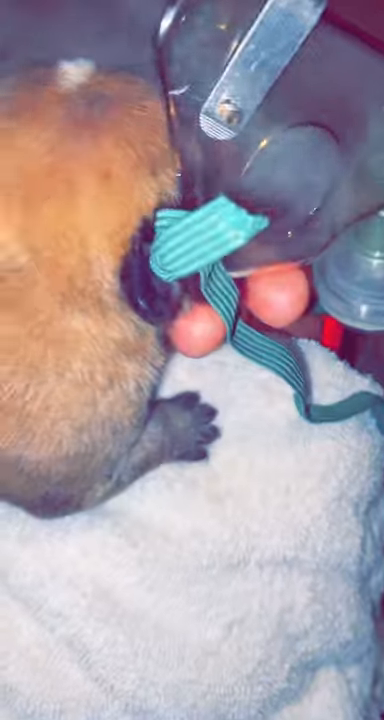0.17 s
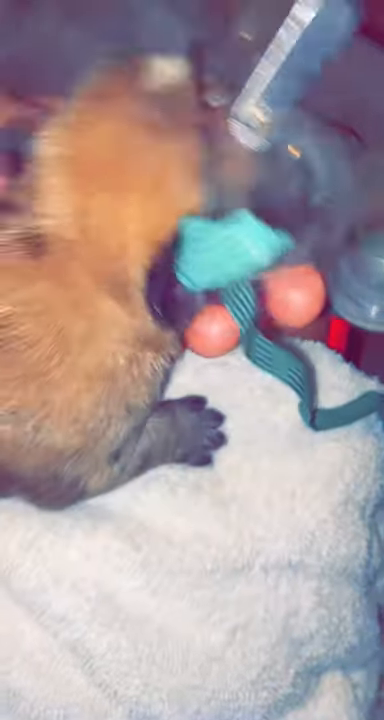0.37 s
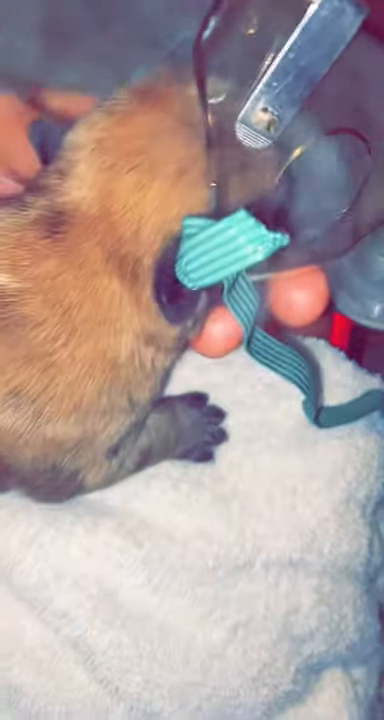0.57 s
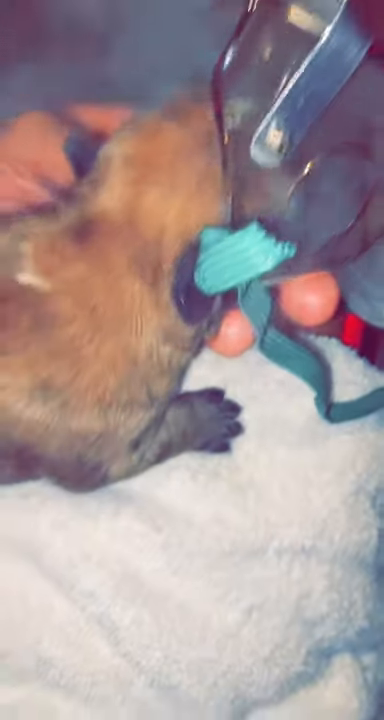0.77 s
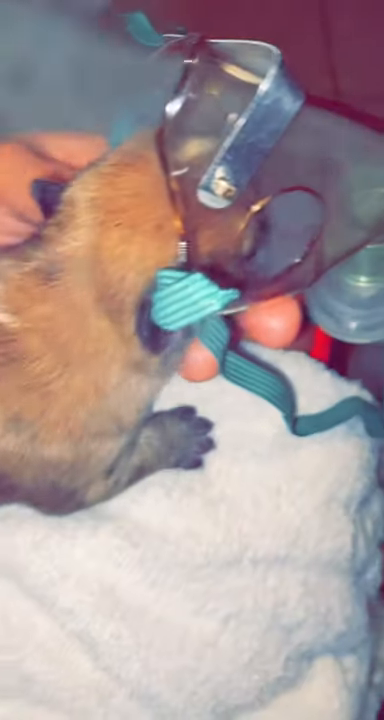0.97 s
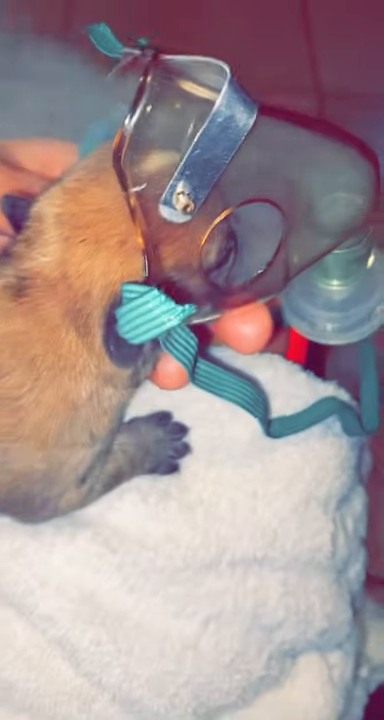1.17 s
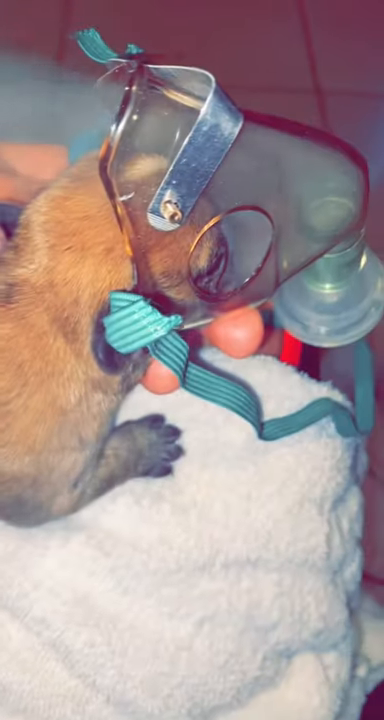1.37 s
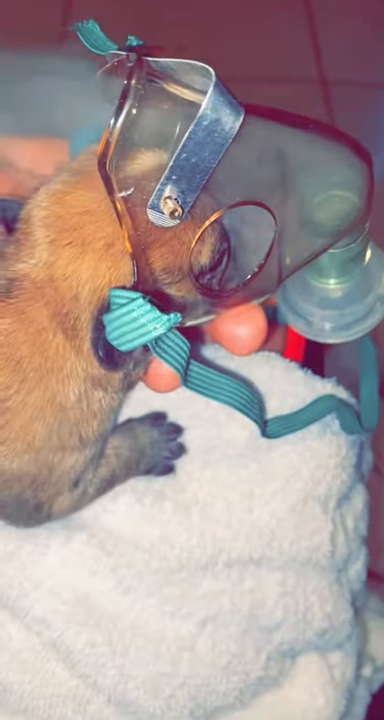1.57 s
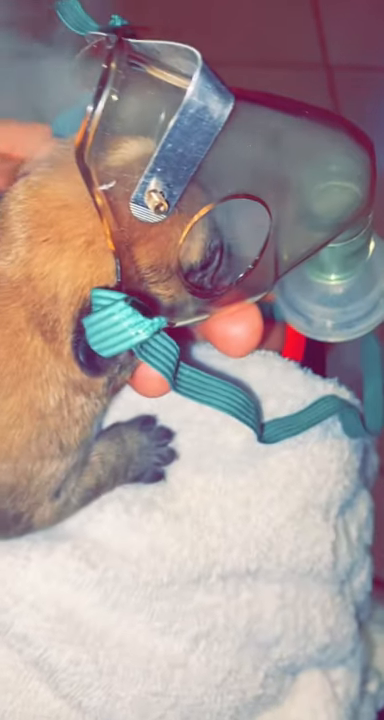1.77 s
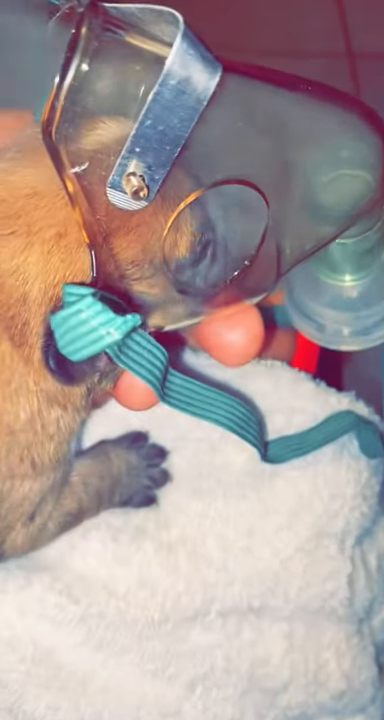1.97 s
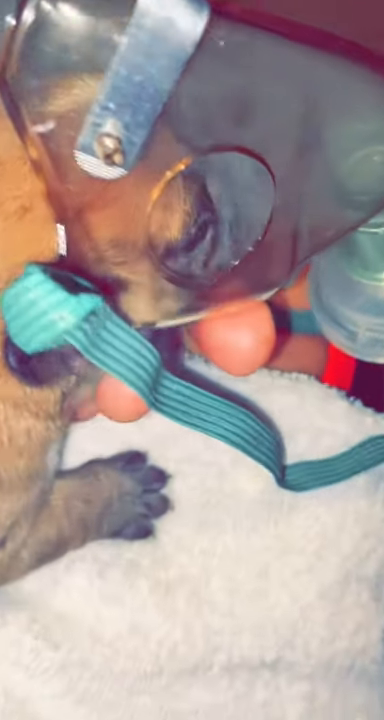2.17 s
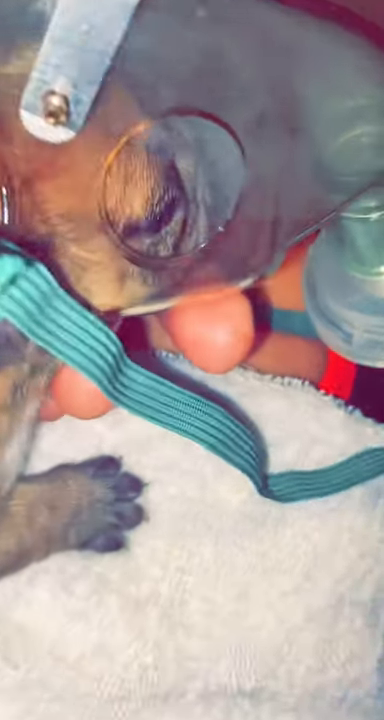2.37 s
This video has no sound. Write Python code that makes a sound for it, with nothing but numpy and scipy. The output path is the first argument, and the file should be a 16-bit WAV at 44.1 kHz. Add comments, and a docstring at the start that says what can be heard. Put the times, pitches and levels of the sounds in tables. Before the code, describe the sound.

Nebulizer running close by indoors: a rapid droning motor buzz under a breathy, spitting spray hiss

```python
"""Indoors, a nebulizer runs, heard in mono from beside its mask, after a moment of silence.
The piston compressor throbs once a turn: tones at multiples of the shaft rate line up at each stroke.
Noise that surges with the strokes, steady-pitched hum and a repeating valve rattle fill in the pump.
The jet is shaped noise that hisses, whistles and spits; its colour shifts as the mask is moved.
Droplets tick in the cup as short fading tones."""
import sys
import numpy as np
from scipy.fft import rfft, irfft, next_fast_len
from scipy.io import wavfile
from scipy.ndimage import map_coordinates

SR = 44100
rng = np.random.default_rng(int(sys.argv[2]) if len(sys.argv) > 2 else 0)


def dump_mix(stems):
    """Bounce the given channels to the path in sys.argv[1] as a 16-bit WAV at rate SR."""
    frames = np.atleast_2d(stems).T  # one column per channel
    limited = np.clip(frames, -1, 1)  # hard clip at full scale
    pcm = np.round(limited * 32767).astype(np.int16)
    wavfile.write(sys.argv[1], SR, pcm)


N = 111573  # length in samples

# Tones in each pump stroke: shaft_multiple, relative_level_db
THROB_TONES = [(10, -46), (11, -29.5), (12, -27), (13, -25), (14, -35), (15, -42.5)]
# Rise and fall of the throb, used around its own average: time_s, relative_level_db
THROB_SWELL_CURVE = [(.14, -25), (.23, -19.5), (.38, -24.5), (.49, -19), (.59, -23.5), (.87, -19.5),
                     (.98, -22), (1.1, -20), (1.3, -19.5), (1.36, -23), (1.44, -19.5), (1.52, -24),
                     (1.75, -19.5), (1.97, -25.5), (2.06, -23), (2.17, -25.5), (2.35, -21), (2.52, -22.5)]
# Hum and whine of the housing: shaft_multiple, level_db (before a slight waver)
HOUSING_HUM = [(1, -44), (2, -39.5), (3, -48.5), (4, -39), (5, -47.5), (6, -45.5), (7, -47), (8, -47),
               (16, -44.5), (17, -48.5), (20, -49.5), (22, -51.5), (23, -49), (25, -48.5), (28, -51),
               (29, -53), (30, -56), (31, -54), (32, -55), (54, -44.5), (61, -46.5), (73, -47.5), (76, -58),
               (78, -45), (83, -45.5)]
# Motor buzz at fixed pitches: pitch_hz, level_db (before a slight waver)
MOTOR_BUZZ = [(120, -43.5), (128, -46.5), (240, -45.5)]
# Tone colour of the valve rattle: frequency_hz, relative_level_db
RATTLE_COLOUR = [(900, -50), (1050, 2), (1700, -9), (2000, -24), (3000, -13), (3500, -21), (4200, -8),
                 (5000, -18), (6500, -9), (9000, -24)]
# Tone colour of air churning in the pump: frequency_hz, relative_level_db
CHURN_COLOUR = [(25, -70), (45, -45), (70, -13), (100, -12.5), (190, -16.5), (290, -7), (420, -9),
                (520, -2), (600, 0.5), (720, -2.5), (810, -9), (960, -6), (1200, -17), (1700, -24.5),
                (3000, -45)]
# Hiss through the mask before it is moved: frequency_hz, relative_level_db
HISS_COLOUR_BEFORE = [(600, -17), (1800, -13), (2300, -2.5), (2600, -8.5), (2950, -7), (3500, -2.5),
                      (4500, -5), (5250, 2.5), (6000, -8), (6600, -5.5), (7000, -7.5), (7600, -5),
                      (8300, -7), (9200, -17.5), (11200, -26), (13000, -40)]
# Hiss through the mask after it is moved: frequency_hz, relative_level_db
HISS_COLOUR_AFTER = [(600, -7), (1800, -9.5), (2300, 1), (2600, -4), (3000, -1), (3600, -4.5), (4400, -2.5),
                     (5300, -3.5), (6100, -7.5), (6750, 1.5), (7250, -7.5), (7650, -1), (8300, -8.5),
                     (9200, -18.5), (11200, -30.5), (13000, -40)]
# Loudness of the hiss over time: time_s, relative_level_db
HISS_LOUDNESS = [(0.1, -24.5), (0.23, -26.5), (0.38, -23.5), (0.6, -26), (0.8, -27.5), (1.0, -28),
                 (1.3, -29), (1.55, -28.5), (1.8, -29.5), (2.0, -29), (2.3, -29), (2.5, -27.5)]
# Tone colour of the fine spray: frequency_hz, relative_level_db
FIZZ_COLOUR = [(9000, -39), (10800, -9), (11400, -13.5), (12100, 4), (12700, -13), (13150, -2),
               (13650, -30), (14400, -13), (15000, -4), (15450, 1), (15900, -6.5)]
# Loudness of the fizz over time: time_s, relative_level_db
FIZZ_LOUDNESS = [(0.1, -40.8), (0.25, -42), (0.42, -36.5), (0.6, -42), (0.9, -45), (1.1, -40.0),
                 (1.35, -37.5), (1.6, -40), (1.9, -37.5), (2.1, -38.1), (2.33, -38.5), (2.5, -43.5)]
# Hollow note of the mask, drifting in pitch: time_s, centre_hz, level_db
HOLLOW_NOTE = [(.1, 2958, -36.5), (0.351, 3020, -33), (0.799, 3098, -34.5), (1.048, 2950, -34),
               (1.28, 3140, -39), (1.449, 2936, -41), (1.77, 3016, -32.5), (1.95, 2920, -41),
               (2.2, 3123, -35.5), (2.349, 3000, -39), (2.5, 2580, -38)]
# Breathy whistle of the jet: time_s, level_db
WHISTLE_LOUDNESS = [(.1, -41), (.42, -35.5), (.58, -43), (.77, -31.5), (.92, -48), (1.3, -41), (1.6, -37),
                    (2.1, -40.5), (2.4, -34)]
# Louder drops in the cup: start_s, pitch_hz, level_db
LOUD_DROPS = [(1.2805, 3100, -17), (1.2958, 3600, -14)]

START_S, TOP_HZ = .079, 15800  # when the sound switches in; highest pitch kept
SHAFT_HZ, STROKE_S = 53.865, .4792  # turns per second; time of one stroke, before jitter
JITTER_S, STROKE_SCATTER_DB = .00002, .6  # sizes of the random unevenness in time and level
THROB_DB, DRONE_ORDER, DRONE_DB = -2.5, 12, -24.5  # the drone is also shifted by THROB_DB
CHURN_DB, CHURN_PULSE = -28.5, .15
RATTLE_DB, RATTLE_LOOSE = -42, .39  # level; share of random unevenness
MOVE_FROM_S, MOVE_TO_S = .724, .96  # the mask moves between these times
HISS_DB, FIZZ_DB = -1.93, 3  # added to the loudness curves
HISS_PULSE, SPIT_DB, SPIT_HZ = .099, 1.45, 405.3  # pump pulse; size and rate of the spitting
HOLLOW_WIDTH_HZ, WHISTLE_HZ, WHISTLE_WIDTH_HZ = 200, 7920, 105  # widths reach out to each side
DROPS_PER_S, DROP_HZ, DROP_SPREAD = 170, 2990, .23  # spread is in natural-log pitch, up or down
DROP_DB, DROP_SCATTER_DB, DROP_RANGE_DB = -31, 3, 9  # smallest drop, typical extra, most extra
DROP_CYCLES, DROP_RISE_S = 5.5, .0002  # fade length in cycles; onset time


def amp(db):
    """Turn decibels into a multiplier."""
    return 10 ** (np.asarray(db) / 20)


def unit(x):
    """Scale a sound to an average strength (rms) of 1."""
    return x / np.sqrt(np.mean(x ** 2) + 1e-20)


def along(points, hz):
    """Read a table of frequencies and values, with frequency on a log axis."""
    f, v = np.transpose(points)
    return np.interp(np.log(hz + 1), np.log(f + 1), v)


def curve(rows):
    """Join time and value rows with straight lines, one value per sample."""
    return np.interp(np.arange(N) / SR, *np.transpose(rows))


def wobble(rate):
    """Make a smooth random curve through rate random points a second."""
    points = rng.standard_normal(N // 8)
    return map_coordinates(points, [np.arange(N) * rate / SR], mode="wrap")


def filtered(x, response):
    """Scale each frequency in a sound by the given response."""
    m = next_fast_len(N + 8192)  # spare room keeps the end from wrapping onto the start
    return irfft(rfft(x, m) * response(np.fft.rfftfreq(m, 1 / SR)), m)[:N]


def noise(colour):
    """Shape random noise to a tone colour, with rms 1."""
    return unit(filtered(rng.standard_normal(N), lambda hz: amp(along(colour, hz))))


def narrow(centre_hz, width_hz):
    """Make noise ringing around one pitch, which may glide, with rms 1."""
    def slow_noise():
        """Keep only the slow part of random noise; its width sets the ringing's width."""
        return filtered(rng.standard_normal(N), lambda hz: 1 / (1 + (hz / width_hz) ** 2))

    phase = 2 * np.pi * np.cumsum(centre_hz * np.ones(N)) / SR
    return unit(slow_noise() * np.cos(phase) + slow_noise() * np.sin(phase))


def shaft():
    """Count turns of the slightly unsteady shaft; strokes fall on whole numbers."""
    jitter = JITTER_S * (wobble(7.2) + .3 * wobble(50))
    return SHAFT_HZ * (np.arange(N) / SR - STROKE_S + jitter)


def throb(turns):
    """Tones peaking together make a short hollow burst each stroke, over a drone of the housing."""
    burst = sum(amp(db) * np.cos(2 * np.pi * k * turns) for k, db in THROB_TONES)
    uneven = amp(STROKE_SCATTER_DB * wobble(SHAFT_HZ))
    # Sine rather than cosine: the drone runs a quarter cycle behind
    drone = amp(DRONE_DB) * np.sin(2 * np.pi * DRONE_ORDER * turns)
    swell_db = curve(THROB_SWELL_CURVE)
    level = amp(THROB_DB + swell_db - swell_db.mean())
    return np.sqrt(2) * (burst * uneven + drone) * level


def churn(turns):
    """Low air noise surges with each stroke of the pump."""
    surge = 1 + CHURN_PULSE * np.cos(2 * np.pi * turns)
    return amp(CHURN_DB) * unit(noise(CHURN_COLOUR) * surge)


def jet(turns):
    """Hiss, mask note, whistle and fizz share the pump's pulse and the uneven spitting of the liquid."""
    moved = curve([(MOVE_FROM_S, 0), (MOVE_TO_S, 1)])
    before = np.sqrt(1 - moved) * noise(HISS_COLOUR_BEFORE)
    after = np.sqrt(moved) * noise(HISS_COLOUR_AFTER)
    hiss = (before + after) * amp(HISS_DB + curve(HISS_LOUDNESS))
    hollow_hz = curve([(s, hz) for s, hz, db in HOLLOW_NOTE])
    hollow_db = curve([(s, db) for s, hz, db in HOLLOW_NOTE])
    hollow = narrow(hollow_hz, HOLLOW_WIDTH_HZ) * amp(hollow_db)
    whistle = narrow(WHISTLE_HZ, WHISTLE_WIDTH_HZ) * amp(curve(WHISTLE_LOUDNESS))
    fizz = noise(FIZZ_COLOUR) * amp(FIZZ_DB + curve(FIZZ_LOUDNESS))
    pulse = 1 + HISS_PULSE * np.cos(2 * np.pi * turns)
    spitting = amp(SPIT_DB * wobble(SPIT_HZ))
    return unit(pulse * spitting) * (hiss + hollow + whistle + fizz)


def droplets():
    """Droplets tick in the cup as short ringing tones; higher ones fade faster, and a few are louder."""
    when, pitch, size = rng.random((int(DROPS_PER_S * N / SR), 3)).T
    # Small drops are common, big ones rare
    size_db = np.minimum(-DROP_SCATTER_DB * np.log(1 - size), DROP_RANGE_DB)
    pitch_hz = DROP_HZ * np.exp(DROP_SPREAD * (2 * pitch - 1))
    faint = np.transpose([when * N / SR, pitch_hz, DROP_DB + size_db])
    s, hz, db = np.vstack([faint, LOUD_DROPS]).T[:, :, None]
    t = np.arange(SR // 80) / SR
    fade = np.exp(-hz * t / DROP_CYCLES)
    onset = 1 - np.exp(-t / DROP_RISE_S)
    ticks = amp(db) * np.sin(2 * np.pi * hz * t) * fade * onset
    at = (s * SR).astype(int) + np.arange(len(t))
    return np.bincount(at.ravel(), ticks.ravel(), N)[:N]  # add every tick at its place


def hum(turns, waver_db):
    """The housing hums at multiples of the shaft rate and the motor buzzes, each tone wavering a little."""
    t = np.arange(N) / SR
    tones = [(k * turns, db) for k, db in HOUSING_HUM]
    tones += [(hz * t, db) for hz, db in MOTOR_BUZZ]
    total = np.zeros(N)
    for cycles, db in tones:
        level = amp(db + waver_db * wobble(4.83))
        total += level * np.sqrt(2) * np.sin(2 * np.pi * (cycles + rng.random()))
    return total


def rattle(turns, size=2048):
    """The valves repeat one small clatter every turn, with its strength varying a little."""
    hz = np.arange(size // 2 + 1) * SHAFT_HZ
    level_db = along(RATTLE_COLOUR, hz) + 1.32 * rng.standard_normal(len(hz))
    random_phase = np.exp(2j * np.pi * rng.random(len(hz)))
    one_turn = irfft(amp(level_db) * random_phase)
    clatter = unit(np.interp(turns, np.arange(size) / size, one_turn, period=1))
    return amp(RATTLE_DB) * unit(clatter * (1 + RATTLE_LOOSE * wobble(90)))


def scene():
    """Mix compressor, jet and drops, the same in both channels."""
    turns = shaft()
    compressor = throb(turns) + churn(turns) + hum(turns, waver_db=1.0) + rattle(turns)
    mono = compressor + jet(turns) + droplets()
    return np.array([mono, mono])


def record(dry):
    """Switch the sound in after a moment of silence and cut off the very highest pitches."""
    on = np.arange(N) / SR >= START_S
    return np.array([filtered(ch * on, lambda hz: hz < TOP_HZ) for ch in dry])


dry = scene()
out = record(dry)
dump_mix(out)
```